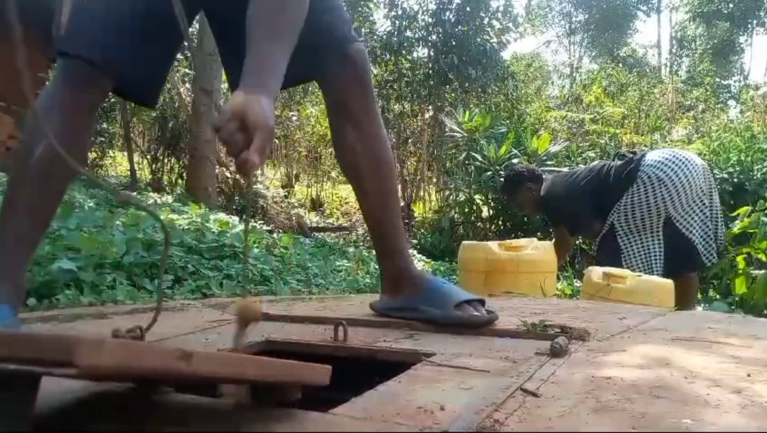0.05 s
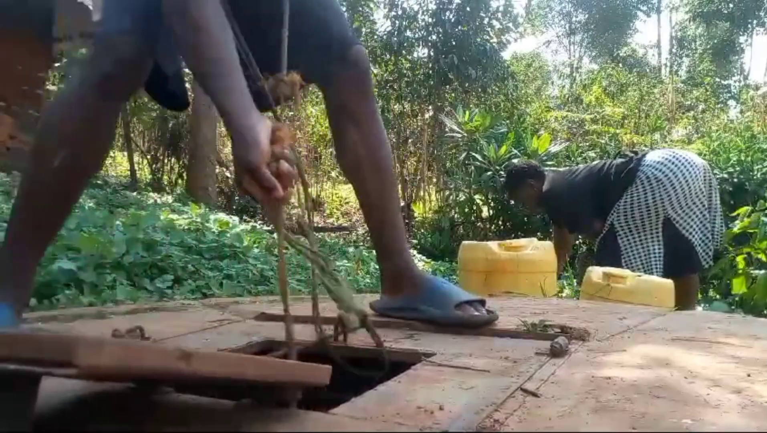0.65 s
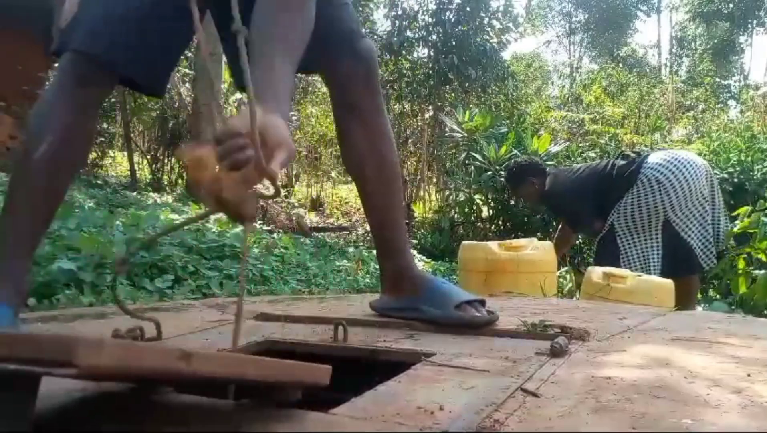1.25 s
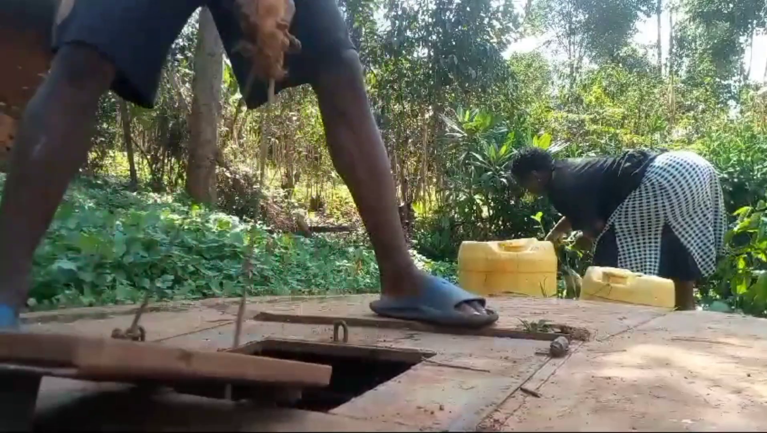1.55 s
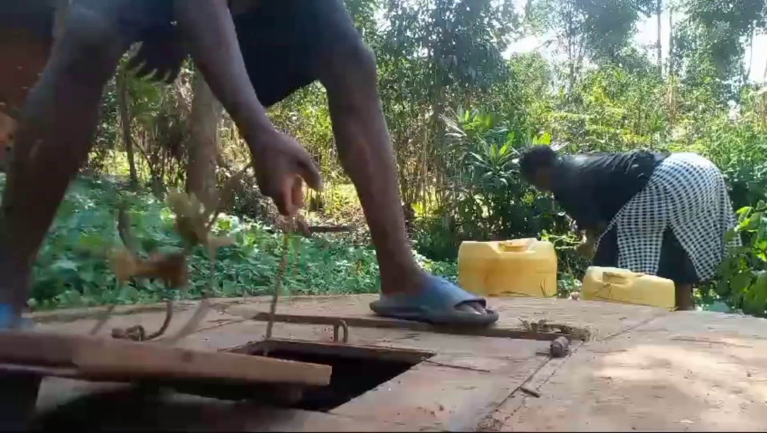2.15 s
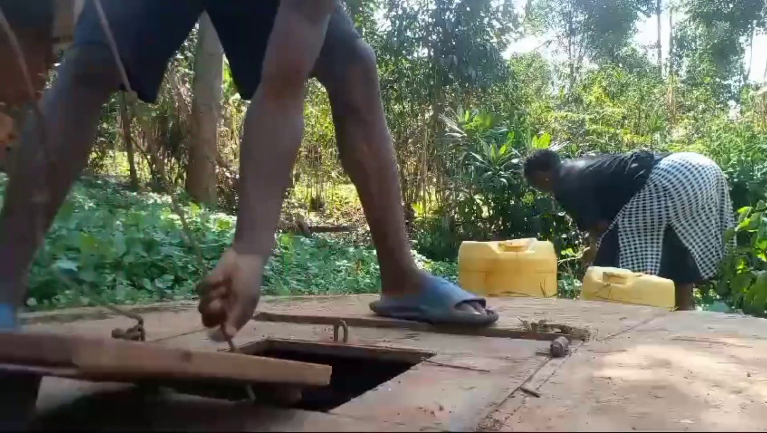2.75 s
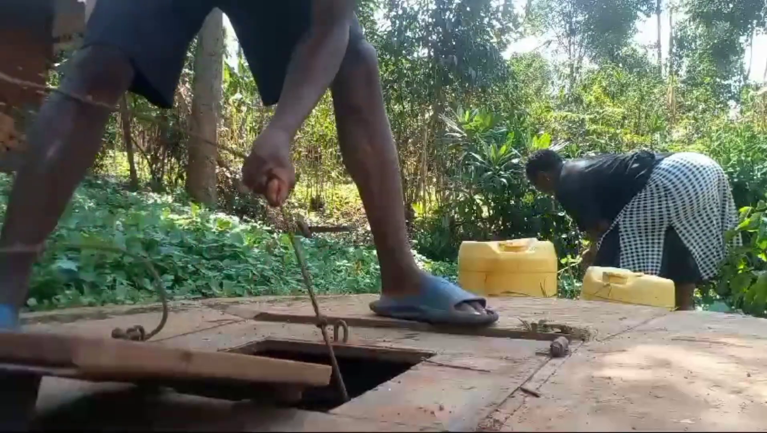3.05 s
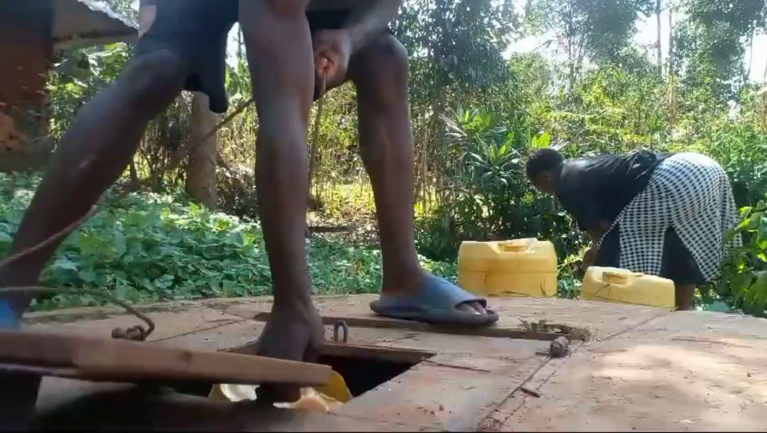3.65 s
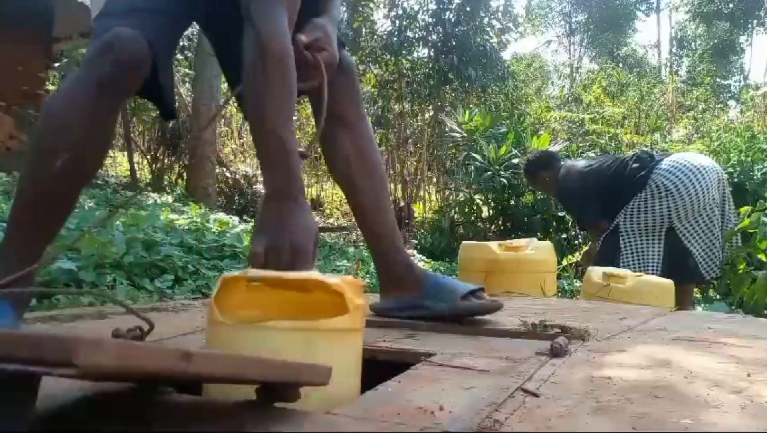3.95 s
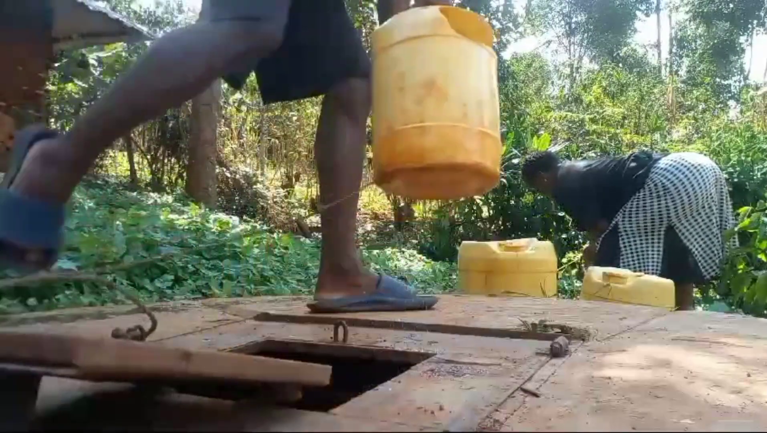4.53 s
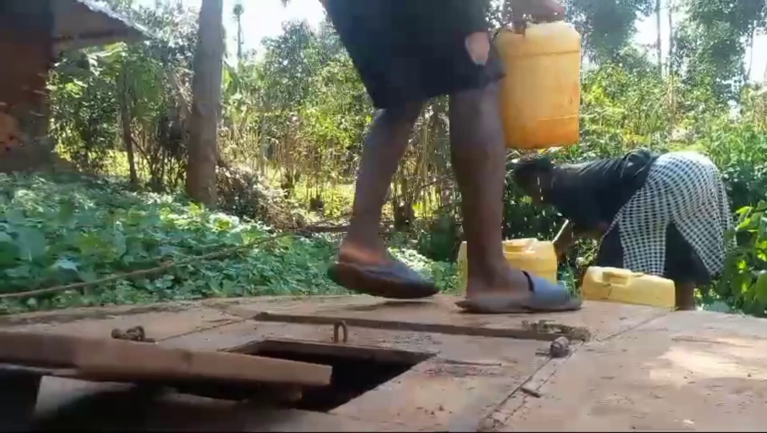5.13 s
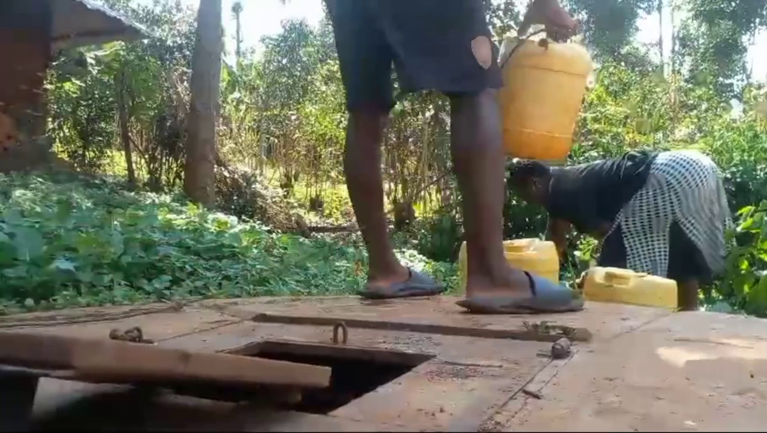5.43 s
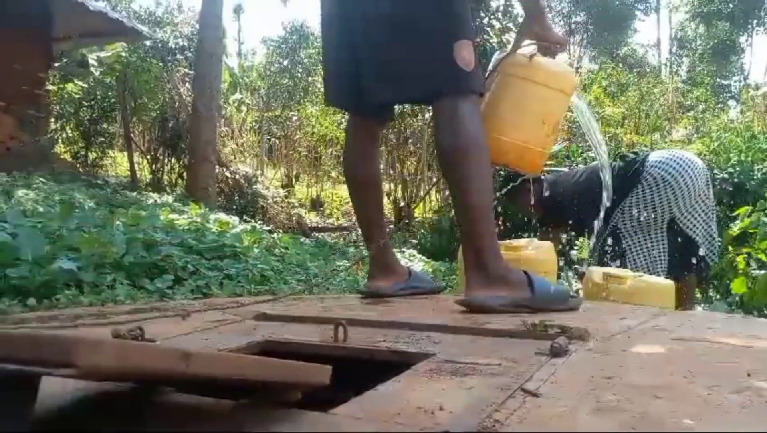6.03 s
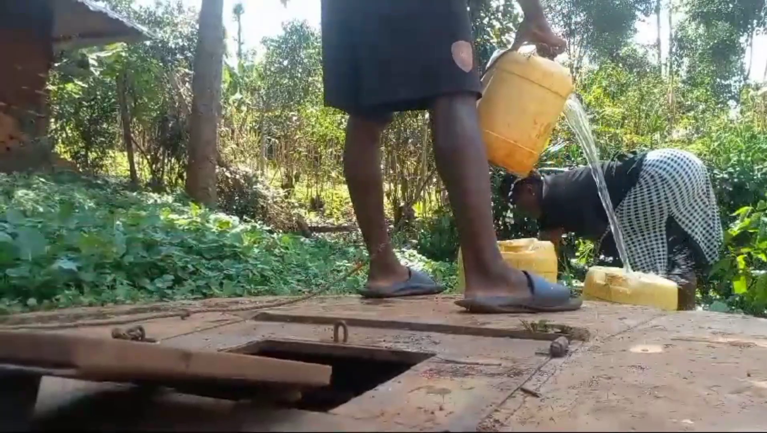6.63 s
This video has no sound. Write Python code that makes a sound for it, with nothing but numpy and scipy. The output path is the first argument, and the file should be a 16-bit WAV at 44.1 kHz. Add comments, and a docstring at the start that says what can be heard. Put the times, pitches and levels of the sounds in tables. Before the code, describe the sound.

Close to the rim of a garden well, a rope rustles in repeated pulls and a plastic can of water bangs in the echoing shaft. Wet slaps and a few light footsteps follow as it is lifted out and carried. Near the end a stream of water splatters onto an empty can, which drums hollowly. Thin, high insect trills and a low outdoor rumble stay faintly underneath.

```python
"""Drawing water at a garden well

One small microphone close to the rim, insects singing behind. A full plastic jerrycan is hauled
up hand over hand, booming against the shaft while the rope rubs over the rim. It is grabbed,
lifted out, slops water on the slab and is carried a few steps in sandals. Then it is poured
onto an empty can, which drums under the stream."""
import sys
import numpy as np
from scipy import signal
from scipy.fft import rfft, irfft, next_fast_len
from scipy.io import wavfile

SR = 44100
rng = np.random.default_rng(int(sys.argv[2]) if len(sys.argv) > 2 else 0)


def file_out(sig):
    """Save sig as 16-bit WAV at sys.argv[1]."""
    # one column per channel
    cols = np.atleast_2d(sig).T
    # limit, then scale
    lim = np.clip(cols, -1, 1)
    pcm = np.round(lim * 32767).astype(np.int16)
    wavfile.write(sys.argv[1], SR, pcm)


N = 298998

# Spectrum of the garden air: frequency_hz, level_db
GARDEN_SPECTRUM = [(20, -25), (40, -5.5), (80, -6.5), (130, -10), (200, -16), (480, -19), (1200, -26),
                   (4000, -31.5), (6500, -24.5), (9000, -21), (16000, -26)]
# Insect trills: start_s, end_s, pitch_hz, width_hz, level_db, swell_s
INSECT_TRILLS = [(-.1, 0.23, 8700, 350, -57, .1), (-.1, 6.8, 6750, 500, -63, .1),
                 (1.6, 2.6, 10380, 420, -51.5, .35), (2.72, 4.2, 8630, 350, -56.5, .1),
                 (4.5, 5.54, 10340, 420, -49.5, .4), (5.54, 8, 8510, 350, -57, .1)]
# Rumble as a leg swings past the microphone: time_s, level_db
BUFFET_LEVEL = [(4.38, -75), (4.44, -46), (4.455, -24), (4.52, -25), (4.56, -36.5), (4.66, -71)]
# Spectrum of that rumble: frequency_hz, level_db
BUFFET_SPECTRUM = [(20, -21), (60, 16), (110, -9), (300, 5.5), (600, -7.5), (1500, -10), (16000, -103)]
# Small knocks of knots, grit, drops and feet: start_s, level_db, centre_hz, decay_s
SMALL_KNOCKS = [(0.193, -29.5, 1460, 0.0052), (0.524, -16.5, 5400, 0.024), (0.787, -40, 4460, 0.021),
                (0.914, -32, 3970, .006), (1.175, -32, 6250, .004), (1.847, -30.5, 1520, 0.0094),
                (1.897, -33, 600, .02), (2.093, -32, 577, 0.01), (2.184, -17.5, 1710, 0.0039),
                (2.394, -17, 12800, 0.0049), (2.397, -28, 4400, 0.016), (2.510, -22.5, 11300, 0.0049),
                (2.563, -22.5, 4700, 0.0081), (3.150, -29, 2440, 0.0032), (3.233, -23.5, 2350, 0.0074),
                (3.235, -28, 435, 0.032), (3.288, -25, 1470, 0.0018), (3.338, -29.5, 1500, 0.016),
                (3.348, -15, 2750, 0.00092), (3.381, -31.5, 5100, 0.037), (3.453, -35.5, 130, 0.11),
                (3.547, -12, 1200, 0.0021), (3.55, -28.5, 140, 0.025), (4.045, -11.5, 1970, 0.0018),
                (4.172, -10, 2250, 0.0078), (4.441, -30, 300, 0.0098), (4.844, -22, 1020, .014),
                (5.083, -20.5, 1200, 0.0061), (5.317, -7.5, 2320, 0.0028), (5.324, -14, 2220, 0.0044),
                (5.741, -28, 10000, .006), (5.939, -33, 1580, 0.007), (6.142, -24, 8000, 0.0086),
                (6.191, -22.5, 6540, 0.005), (6.715, -9, 9100, 0.0016)]
# Hand and feet landing on the full can and the slab: start_s, level_db, pitch_ratio
DULL_KNOCKS = [(3.548, -22, 0.98), (3.63, -46.5, 0.94), (4.21, -31.5, 0.49), (5.029, -24, 0.48)]
# Modes of the full can at pitch_ratio 1: pitch_hz, level_db, t60_s
FULL_CAN_MODES = [(322, -3.5, 0.23), (597, 10.5, 0.11), (726, 16, 0.031), (1180, 7, 0.047),
                  (1920, -38.5, 0.036)]
# Rope zipping through the grip, water swirling in the can: start_s, length_s, level_db, from_hz, to_hz
SWISH_GLIDES = [(0.169, 0.22, -42.5, 2314, 2930), (1.161, 0.16, -37.5, 900, 685),
                (1.513, 0.071, -34.5, 2880, 1707), (2.773, 0.11, -44.5, 3027, 2600),
                (3.44, 0.17, -40.5, 867, 698), (3.943, 0.055, -45, 4170, 2290),
                (3.991, 0.1, -26, 2513, 1490), (4.299, 0.27, -46, 804, 951),
                (4.583, 0.12, -38.5, 3023, 3810), (5.308, 0.038, -13.5, 2095, 2807),
                (5.423, 0.061, -43.5, 670, 546), (6.202, 0.041, -29.5, 2050, 1450)]
# Rope drawn through the hands, over the rim and along the slab: start_s, length_s, level_db
ROPE_PULLS = [(0.144, 0.26, -41), (0.916, 0.31, -38.5), (1.313, 0.46, -41.5), (1.816, 0.36, -42),
              (2.27, 0.49, -39.5), (3.157, 0.5, -37.5), (4.2, 0.41, -39.5), (4.572, 0.31, -39),
              (5.023, 0.055, -34.5)]
# Spectrum of the rubbing fibres: frequency_hz, level_db
ROPE_SPECTRUM = [(40, -25.5), (130, -2.5), (400, -3), (900, -0.5), (2200, -2.5), (4000, -4.5), (7000, -7),
                 (16000, -8.5)]
# Wet slaps and scuffs on shaft, slab and cans: start_s, swell_s, end_level_db, swell_db, body_hz, spray_db
WET_SLAPS = [(0.479, 0.047, -25, 4, 10000, -3), (3.986, 0.11, -30, 0, 3140, 1.5),
             (4.11, 0.093, -17.5, 12.5, 2680, 2.5), (4.333, 0.024, -42.5, -4, 2960, -4),
             (4.433, 0.057, -20.5, 19.5, 3800, -2), (4.496, 0.034, -33, -6, 4600, 8),
             (5.033, 0.031, -30, -0.5, 1400, -2), (5.138, 0.022, -20.5, 5, 2970, 3),
             (5.272, 0.027, -29.5, -5, 3790, -2), (5.296, 0.045, -21.5, 2.5, 2760, -8),
             (5.764, 0.036, -33, 5, 1610, -14), (6, 0.016, -33, 10, 1140, 2.5),
             (6.682, 0.058, -37, -5, 7000, 2)]
# Tones in the shaft, booms of the empty can, and bubbles: start_s, level_db, pitch_hz, decay_cycles
SHORT_RINGS = [(.005, -28, 421, 39), (.005, -28, 737, 42), (.916, -14, 775, 10.5), (1.001, -17, 984, 12),
               (1.025, -22, 308.5, 18.4), (1.155, -30, 401, 7.4), (5.763, -18, 87, 4.4),
               (5.77, -3.5, 1205, 2.4), (5.785, -11, 1860, 5), (5.798, -12, 1560, 3.8),
               (5.941, -9, 1500, 5), (6.001, -22, 162, 3.9), (6.246, -16.5, 160, 7.3),
               (6.284, -10.5, 401, 7.6), (6.35, -8.5, 156.4, 5.1), (6.354, -9, 280, 4.1),
               (6.545, -15, 400, 7.5), (6.618, -9.5, 252.5, 11.6), (6.629, -10.5, 156, 5.8),
               (6.64, -17.5, 381.6, 14)]
# Spray thrown off by the stream: time_s, level_db
SPATTER_LEVEL = [(5.72, -88), (5.742, -49), (5.752, -40), (5.766, -19.5), (5.86, -36), (5.926, -34),
                 (5.938, -19), (5.978, -34), (6.112, -57), (6.144, -44), (6.168, -45.5), (6.198, -30),
                 (6.392, -27), (6.442, -36.5), (6.72, -21), (6.78, -34)]
# Spectrum of that spray: frequency_hz, level_db
SPATTER_SPECTRUM = [(100, -19.5), (500, -18), (1200, -8), (2500, -13.5), (5000, -9), (8000, -14),
                    (16000, -16)]
# The stream on the empty can, a first slop and then a steady pour: time_s, low_modes_db, upper_modes_db
POURS = [
    [(5.72, -77, -78), (5.736, -34, -43), (5.766, -25, -34.5), (5.9, -28, -34.5), (5.916, -30, -39),
     (5.99, -36.5, -44), (6.002, -19, -23.5), (6.026, -28.5, -30), (6.1, -66, -63)],
    [(6.21, -60, -78), (6.252, -14, -18.5), (6.298, -23, -18.5), (6.328, -26, -20.5), (6.358, -10.5, -19),
     (6.42, -21, -28.5), (6.662, -18.5, -17.5), (6.704, -29.5, -29), (6.78, -25, -28)],
]
# Wall and air modes of the empty can: pitch_hz, level_db, width_hz
EMPTY_CAN_MODES = [(86.4, -12, 26), (130.7, -5, 11), (157.6, 1.5, 25), (261.4, -9.5, 72), (300.6, -9, 33),
                   (349, -8, 19), (402.6, -8.5, 20), (518, -27.5, 24), (671, -15, 23), (848, -17, 62),
                   (1000, -18, 79)]
# Blows down the shaft from the can and falling water: start_s, level_db, bass_db, treble_db
SHAFT_BLOWS = [(0.0, -35.5, 10, 8), (0.362, -43, 18, 9.5), (0.478, -13, -2, 12), (.512, -10, -12.5, -9),
               (0.844, -22, -2, 4), (0.911, -23.5, -4, -16), (1.019, -25, -6, -8), (1.585, -35, 20, 11.5),
               (1.64, -42, 8.5, 4.5), (2.165, -29, -6.5, -6), (2.183, -8, -7.5, -2.5), (2.202, -15, 6, -11),
               (2.247, -18.5, -7, -0.5), (2.562, -31, 11, 14.5), (4.741, -16.5, -10.5, -4.5)]
# Spectrum of the shaft's echoes: frequency_hz, level_db
SHAFT_SPECTRUM = [(40, -26.5), (130, -17), (220, -27.5), (290, 0.5), (470, -6), (600, -1), (780, -1),
                  (1300, -7.5), (2000, -5), (3000, -12), (5000, -24), (8000, -36.5), (16000, -23)]
# Full ring time of those echoes: frequency_hz, t60_s
SHAFT_DECAY = [(100, 0.76), (350, 0.82), (1000, 0.67), (2500, 0.42), (6000, 0.46), (15000, 0.2)]
# Air modes of the shaft, with the can deep down or near the top: pitch_hz, deep_db, top_db, full_t60_s
SHAFT_AIR_MODES = [(278.6, -6.5, -16, 0.49), (302.6, -8, -7, 1), (343, -5, -14, 0.82),
                   (401.6, -5, -8, 0.92), (433, -17.5, -6, 0.83), (557, -10.5, -12, 0.64),
                   (595, -25, -26.5, 0.14), (734, -15.5, -16, 1), (790, -5.5, -12, 0.91),
                   (767, -6, -5.5, 0.64), (818, -16.5, -5.5, 0.44), (917, -11.5, -28, 0.9),
                   (929, -11.5, -3, 0.5), (1066, -22, -39, 0.43), (1015, -9.5, -26, 0.18),
                   (1075, -15, -37.5, 1), (1140, -37.5, -12, 0.72), (1325, -11, -5, 0.57),
                   (1546, -13, -14.5, 0.75), (1654, -20.5, -32, 0.98), (1693, -6.5, -5.5, 0.59),
                   (1565, -30.5, -37, .6), (1985, -22, -39, 0.93), (2120, -14.5, -16, 0.81),
                   (2130, -29, -4.5, 0.15), (2880, -12.5, -10, 0.14)]
# The shaft rings shorter as the can rises and leaves it: time_s, t60_ratio
SHAFT_RING_SHARE = [(1.0, 0.93), (2.2, 0.69), (4.7, 0.71)]
# Response of the microphone: frequency_hz, gain_db
MICROPHONE_RESPONSE = [(20, -26), (60, 0.5), (7000, 0), (7900, -10.5), (10000, -6.5), (13000, -1.5),
                       (16000, -6)]

CUTOFF_HZ = 15900
DEEP_S, TOP_S = 0.55, 2.47   # when the can is deep down and near the top


def from_db(db):
    """Decibels to gain."""
    return 10 ** (np.asarray(db) / 20)


def rms_one(x):
    """Scale to unit power."""
    return x / np.sqrt(np.mean(x ** 2) + 1e-20)


def in_time(rows):
    """Each dB column of a curve at every sample; silent before it starts."""
    times, *columns = np.transpose(rows)
    return [np.interp(np.arange(N) / SR, times, column, left=-120) for column in columns]


def at_hz(points, hz):
    """Read a table on a log-frequency axis."""
    frequencies, values = np.transpose(points)
    return np.interp(np.log(hz + 1e-9), np.log(frequencies), values)


def colour(x, points):
    """Give a sound a smooth spectrum."""
    size = next_fast_len(len(x))
    gain = from_db(at_hz(points, np.fft.rfftfreq(size, 1 / SR)))
    return irfft(rfft(x, size) * gain, size)[:len(x)]


def band(x, low, high, order=2):
    """Butterworth band-pass, unit power."""
    edges = [min(low, .4 * SR), min(high, .47 * SR)]
    return rms_one(signal.sosfilt(signal.butter(order, edges, "band", fs=SR, output="sos"), x))


def ring(clicks, hz, t60):
    """A unit click sets a sine of height 1 ringing."""
    radius, angle = np.exp(-np.log(1000) / (t60 * SR)), 2 * np.pi * hz / SR
    return signal.lfilter([0, np.sin(angle)], [1, -2 * radius * np.cos(angle), radius ** 2], clicks + 1e-18)


def grains(size, per_s, spread_db):
    """Random tiny impacts, many weak and a few strong; unit power."""
    strengths = from_db(spread_db * np.minimum(rng.exponential(1, size), 4))
    return rms_one(strengths * rng.choice([-1, 1], size) * (rng.random(size) < per_s / SR))


def wander(size, rate_hz):
    """Slow complex noise of unit power: a drifting strength and phase."""
    lowpass = signal.butter(2, min(rate_hz, SR / 4), fs=SR, output="sos")
    real, imaginary = signal.sosfilt(lowpass, rng.standard_normal((2, size + SR // 4)))[:, SR // 4:]
    return (rms_one(real) + 1j * rms_one(imaginary)) / np.sqrt(2)


def add(out, start_s, sound):
    """Mix a sound in at a time."""
    start = int(np.clip(round(start_s * SR), 0, N - 1))
    out[start:start + len(sound)] += sound[:N - start]


def garden(level_db=-49):
    """The bed of the place: a steady low rumble with a faint high hiss."""
    return from_db(level_db) * rms_one(colour(rng.standard_normal(N), GARDEN_SPECTRUM))


def insects(fade_s=0.025):
    """Off in the garden, narrow high trills swell in and stop short."""
    out, t = np.zeros(N), np.arange(N) / SR
    for start_s, end_s, hz, width_hz, db, swell_s in INSECT_TRILLS:
        envelope = np.clip(np.minimum((t - start_s) / swell_s, (end_s - t) / fade_s), 0, 1)
        out += from_db(db) * envelope * band(rng.standard_normal(N), hz - width_hz / 2, hz + width_hz / 2)
    return out


def yard(close, echo_db=-22, t60=0.26, top_hz=6000):
    """Wall and bushes scatter a faint, dull tail behind the close sounds."""
    t = np.arange(SR // 2) / SR
    tail = band(rng.standard_normal(len(t)), 67, top_hz, order=1) * np.exp(-np.log(1000) * t / t60)
    return close + from_db(echo_db) * signal.fftconvolve(close, tail / np.linalg.norm(tail))[:N]


def buffet():
    """Air and cloth rumble briefly as a leg passes the microphone."""
    rumble = rms_one(colour(rng.standard_normal(N), BUFFET_SPECTRUM))
    return from_db(in_time(BUFFET_LEVEL)[0]) * rumble


def ticks(width_ratio=2.22):
    """Small contacts: hard ones crack high and short, soft ones thud low and longer."""
    out, t = np.zeros(N), np.arange(SR // 3) / SR
    for start_s, db, hz, decay_s in SMALL_KNOCKS:
        noise = band(rng.standard_normal(len(t)), hz / width_ratio, hz * width_ratio)
        add(out, start_s, from_db(db) * np.exp(-t / decay_s) * noise)
    return out


def bumps():
    """Hand and feet knock a few short modes; softer, heavier contacts sound lower."""
    out, click = np.zeros(N), signal.unit_impulse(SR // 2)
    for start_s, db, pitch_ratio in DULL_KNOCKS:
        knock = sum((-1) ** k * from_db(mode_db) * ring(click, hz * pitch_ratio, t60 * pitch_ratio)
                    for k, (hz, mode_db, t60) in enumerate(FULL_CAN_MODES))
        add(out, start_s, from_db(db) * knock)
    return out


def swishes(width_share=0.21):
    """Slipping rope or swirling water: a band of hiss swells and fades while its pitch slides."""
    out = np.zeros(N)
    for start_s, length_s, db, from_hz, to_hz in SWISH_GLIDES:
        progress = np.linspace(0, 1, int(length_s * SR))
        hz = from_hz * (to_hz / from_hz) ** progress
        drift = wander(SR // 2, width_share * hz.mean())[:len(progress)]
        hiss = np.real(drift * np.exp(2j * np.pi * np.cumsum(hz) / SR))
        arch = np.sqrt(2 * np.abs(np.sin(np.pi * progress)))
        add(out, start_s, from_db(db) * arch * hiss)
    return out


def rope(grip_s=0.0083, let_go_s=0.081, sag_db_per_s=4.5, flutter_db=3.0, grit_db=-9, grit_s=0.0011):
    """On each pull fibres catch and slip in a dry, uneven rustle, and grit clicks under the rope."""
    effort, t = np.zeros(N), np.arange(2 * SR) / SR
    for start_s, length_s, db in ROPE_PULLS:
        grip = 1 - np.exp(-t / grip_s)
        release = np.exp(-np.maximum(t - length_s, 0) / let_go_s)
        add(effort, start_s, from_db(db - sag_db_per_s * t) * grip * release)
    fibres = rms_one(colour(grains(N, per_s=5000, spread_db=-0.5), ROPE_SPECTRUM))
    catches = np.abs(grains(N, per_s=45, spread_db=5.5))
    bursts = signal.lfilter([1], [1, -np.exp(-1 / (grit_s * SR))], catches + 1e-18)
    grit = band(bursts * rng.standard_normal(N), 900, 12000, order=1)
    flutter = from_db(flutter_db * wander(N, rate_hz=28).real)
    return effort * (fibres * flutter + from_db(grit_db) * grit)


def splashes(width_ratio=1.83, spray_hz=3600, thud_db=-17, fall_share=0.2):
    """Wet contacts burst into crackle and drain away: a body, fine spray and a soft thud below."""
    out, t = np.zeros(N), np.arange(SR // 4) / SR
    for start_s, swell_s, db, swell_db, body_hz, spray_db in WET_SLAPS:
        drops = grains(len(t), per_s=6900, spread_db=1.0)
        body = band(drops, body_hz / width_ratio, body_hz * width_ratio)
        spray = from_db(spray_db) * band(drops, spray_hz, CUTOFF_HZ)
        thud = from_db(thud_db) * band(rng.standard_normal(len(t)), 170, 1200)
        swell = from_db(db + swell_db * np.minimum(t / swell_s - 1, 0))
        fall = np.exp(-np.maximum(t - swell_s, 0) / (fall_share * swell_s))
        add(out, start_s, swell * fall * (body + spray + thud))
    return out


def short_rings(onset_cycles=1.03, climb=0.7):
    """The shaft, the empty can and bubbles ring briefly, each as a damped sine climbing in pitch."""
    out, t = np.zeros(N), np.arange(SR // 3) / SR
    for start_s, db, hz, cycles in SHORT_RINGS:
        age = t * hz / cycles
        pitch_hz = hz * (1 + climb / cycles ** 1.5 * np.minimum(age, 4))   # fewer cycles, more chirp
        envelope = (1 - np.exp(-t * hz / onset_cycles)) * np.exp(-age)
        add(out, start_s, from_db(db) * envelope * np.sin(2 * np.pi * np.cumsum(pitch_hz) / SR))
    return out


def spatter(gain_db=1.0, clump_db=2.5, bubble_db=-8, t60_cycles=22):
    """Droplets crackle in clumps around the stream, and tiny bubbles ping."""
    crackle = rms_one(colour(grains(N, per_s=3500, spread_db=3.0), SPATTER_SPECTRUM))
    pings = sum(rms_one(ring(grains(N, per_s=13, spread_db=5.5), hz, t60_cycles / hz))
                for hz in np.geomspace(2200, 13000, num=16))
    level_db = in_time(SPATTER_LEVEL)[0] + gain_db + clump_db * wander(N, rate_hz=35).real
    return from_db(level_db) * (crackle + from_db(bubble_db) * rms_one(pings))


def patter(gain_db=-7):
    """Lumps of water land on the empty can as irregular soft taps."""
    _, upper_db = in_time(np.concatenate(POURS))
    taps = grains(N, per_s=900, spread_db=2.0)
    return from_db(upper_db + gain_db) * band(taps, 90, 600)


def drumming(split_hz=220, upper_lift_db=2.5, evenness=0.78, shift_db=3.0):
    """The stream keeps the wall and air modes of the empty can ringing."""
    low_db, upper_db = in_time(np.concatenate(POURS))
    out, t = np.zeros(N), np.arange(N) / SR
    for hz, db, width_hz in EMPTY_CAN_MODES:
        drive = wander(N, width_hz / 2)
        drive /= (np.abs(drive) + 0.00081) ** evenness   # a steady stream never lets a mode die away
        spot_db = shift_db * wander(N, rate_hz=8).real   # the stream roams, favouring modes in turn
        stream_db = upper_db + upper_lift_db if hz > split_hz else low_db
        mode = rms_one(np.real(drive * np.exp(2j * np.pi * hz * t)))
        out += from_db(db + stream_db + spot_db) * mode
    return out / np.linalg.norm(from_db(np.array(EMPTY_CAN_MODES)[:, 1]))


def boom(gain_db=-30.5, centre_hz=65, width_ratio=1.6, rise_s=0.04, decay_s=0.14):
    """Each blow sets the whole air column of the well rumbling, late and low."""
    out, t = np.zeros(N), np.arange(SR) / SR
    swell = (1 - np.exp(-t / rise_s)) * np.exp(-t / decay_s)
    for start_s, db, _, _ in SHAFT_BLOWS:
        rumble = band(rng.standard_normal(SR), centre_hz / width_ratio, centre_hz * width_ratio)
        add(out, start_s, from_db(db + gain_db) * swell * rumble)
    return out


def blow_envelopes(hz, t60, bass_db, treble_db, bass_hz=480, treble_hz=1600, late_hz=900):
    """A blow's rise and decay, one row a frequency; long waves zigzag up the shaft and build later."""
    t = np.arange(SR) / SR
    tone = from_db(bass_db / (1 + (hz / bass_hz) ** 4) + treble_db / (1 + (treble_hz / hz) ** 3))
    build_s = 0.00048 * np.exp(-0.1962 * treble_db)   # a duller blow fills the shaft more slowly
    rise = 1 - np.exp(-t / (build_s * (1 + late_hz / hz[:, None])))
    return tone[:, None] * rise * np.exp(-np.log(1000) * t / t60[:, None])


def shaft(gain_db=-0.5, wall_s=0.0048, wall_gain=0.54, sway_share=0.005, sway_hz=13.3):
    """Heard from the rim, each blow fills the shaft with dense echoes and rings its air modes."""
    out, t = np.zeros(N), np.arange(SR) / SR
    edges = np.geomspace(40, 16000, 27)
    band_hz = np.sqrt(edges[1:] * edges[:-1])
    band_t60 = at_hz(SHAFT_DECAY, band_hz)
    band_gains = from_db(at_hz(SHAFT_SPECTRUM, band_hz)) * np.sqrt(np.diff(edges))
    band_gains /= np.linalg.norm(band_gains)
    noise = np.array([band(rng.standard_normal(N + SR), low, high, order=3)
                      for low, high in zip(edges, edges[1:])])
    mode_hz, deep_db, top_db, mode_t60 = np.transpose(SHAFT_AIR_MODES)
    for start_s, db, bass_db, treble_db in SHAFT_BLOWS:
        start = int(start_s * SR)
        ring_share = np.interp(start_s, *np.transpose(SHAFT_RING_SHARE))
        band_envelopes = blow_envelopes(band_hz, band_t60 * ring_share, bass_db, treble_db)
        echoes = band_gains @ (noise[:, start:start + SR] * band_envelopes)
        # the bounce off the opposite wall hollows the echo, differently at each spot
        lag = int(wall_s * SR * rng.uniform(.8, 1.2))
        echoes = (echoes + wall_gain * np.pad(echoes, (lag, 0))[:SR]) / np.hypot(1, wall_gain)
        # the modes waver in pitch as the can swings, and change balance as it rises
        swayed_t = t + sway_share * np.cumsum(wander(SR, sway_hz).real) / SR
        sines = np.sin(2 * np.pi * (mode_hz[:, None] * swayed_t + rng.random((len(mode_hz), 1))))
        height = np.interp(start_s, [DEEP_S, TOP_S], [0, 1])
        mode_gains = from_db(deep_db + height * (top_db - deep_db))
        modes = mode_gains @ (sines * blow_envelopes(mode_hz, mode_t60 * ring_share, bass_db, treble_db))
        clarity = from_db(-0.3921 * treble_db)   # a duller blow rings the modes more clearly
        add(out, start_s, from_db(db + gain_db) * (echoes + clarity * modes))
    return out


def scene():
    """The well below, the work close by and the garden around, in mono."""
    handling = rope() + ticks() + bumps() + swishes()
    close = handling + splashes() + short_rings() + drumming() + patter() + spatter()
    return (garden() + shaft() + boom() + yard(close) + buffet() + insects())[None]


def record(dry):
    """A small microphone with a treble dip; the loudest peaks overload, and the top is cut."""
    clipped = np.clip(colour(dry[0], MICROPHONE_RESPONSE), -1, 1)
    lowpass = signal.ellip(12, .1, 100, CUTOFF_HZ, fs=SR, output="sos")
    return signal.sosfilt(lowpass, clipped)[None]


dry = scene()
out = record(dry)
file_out(out)
```